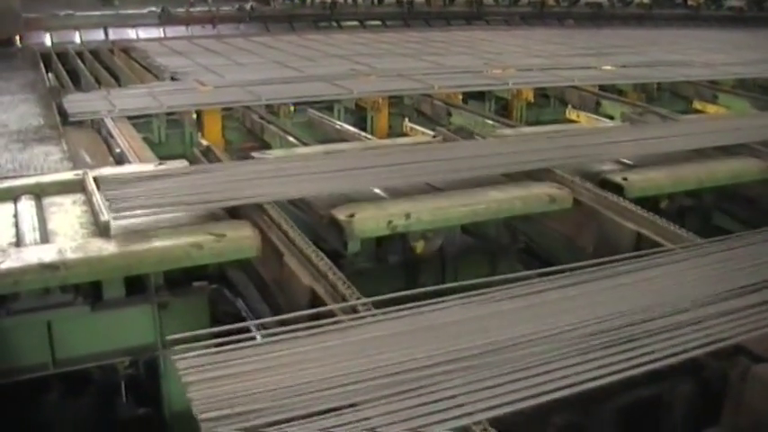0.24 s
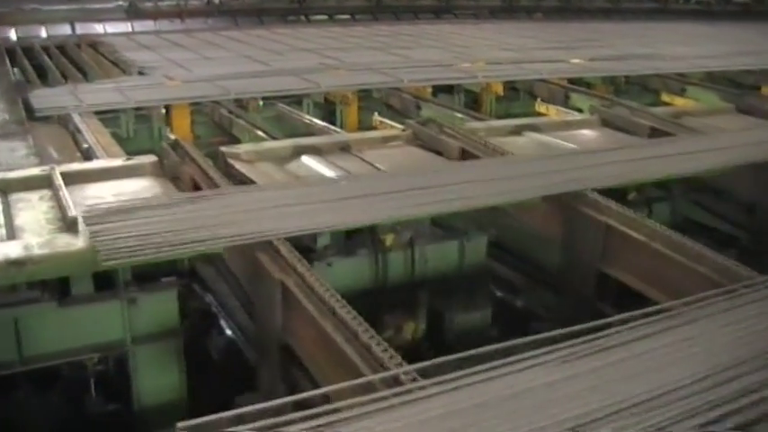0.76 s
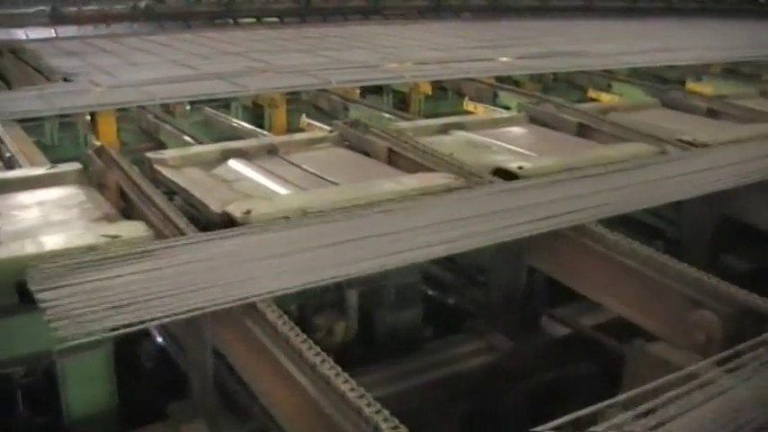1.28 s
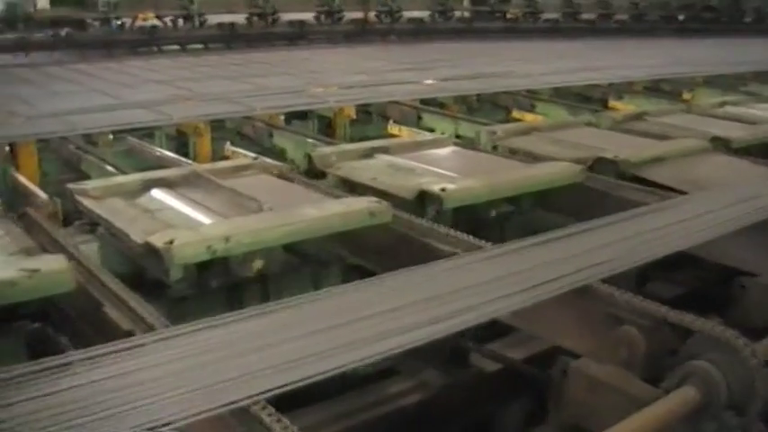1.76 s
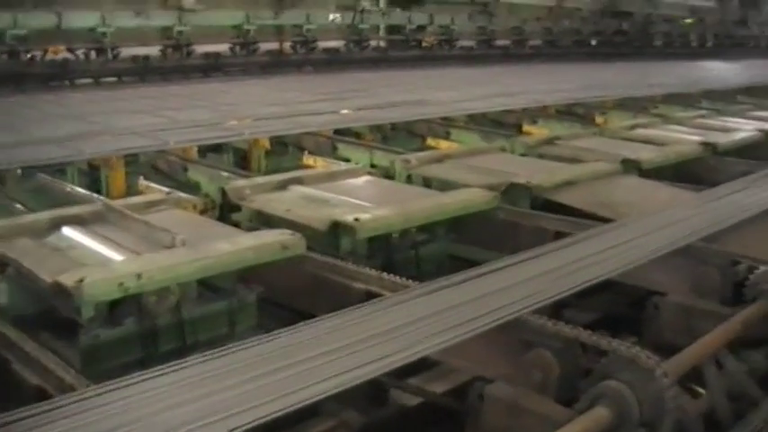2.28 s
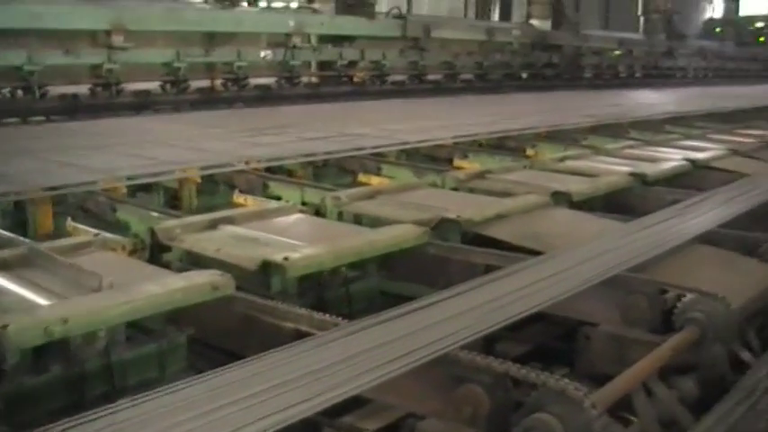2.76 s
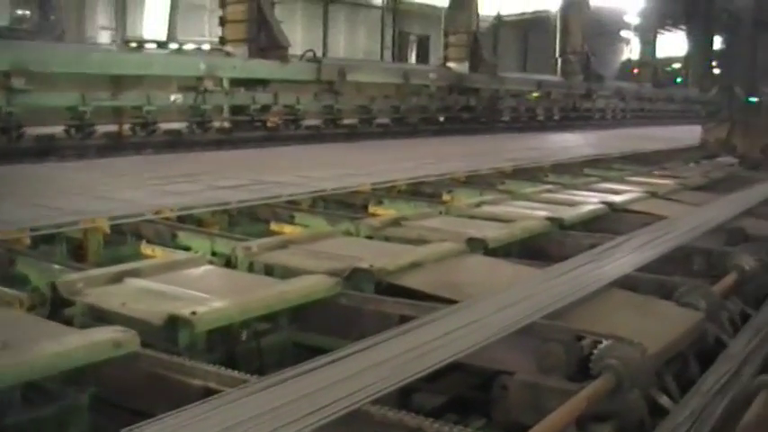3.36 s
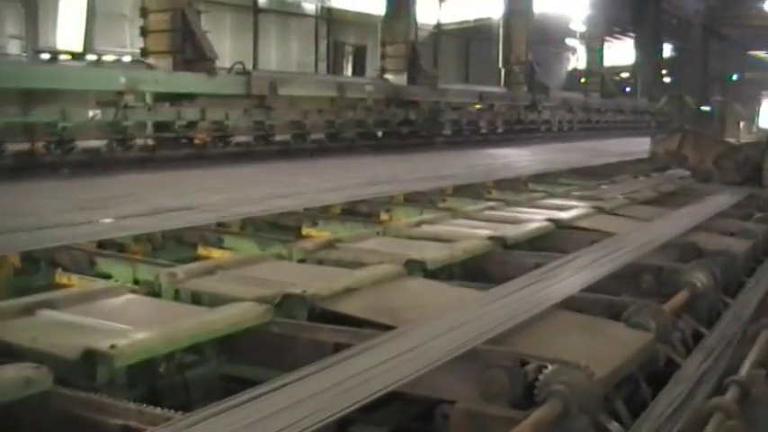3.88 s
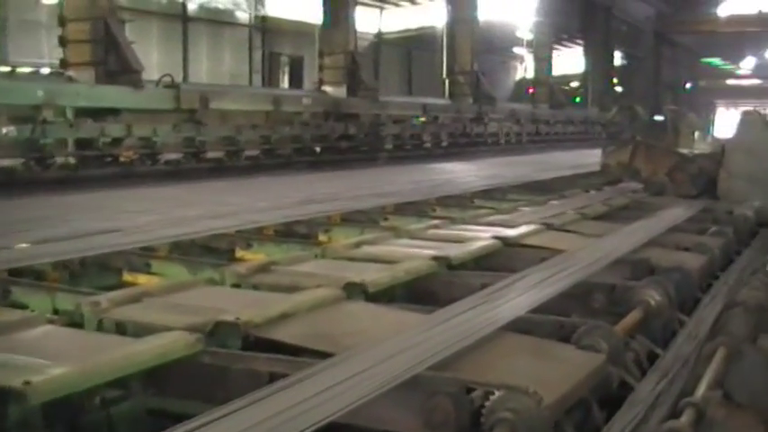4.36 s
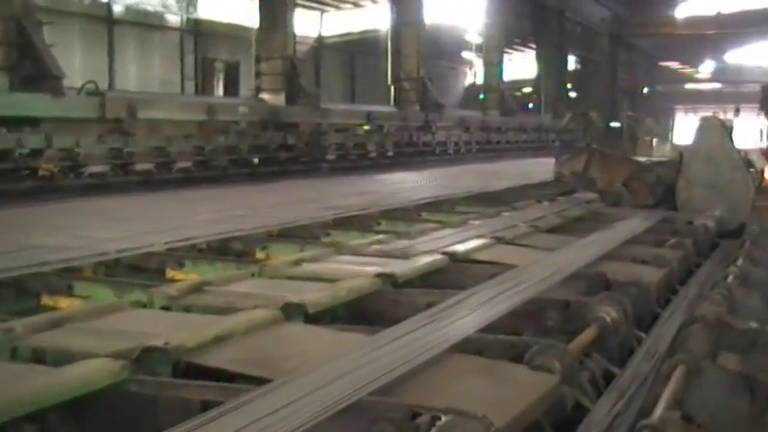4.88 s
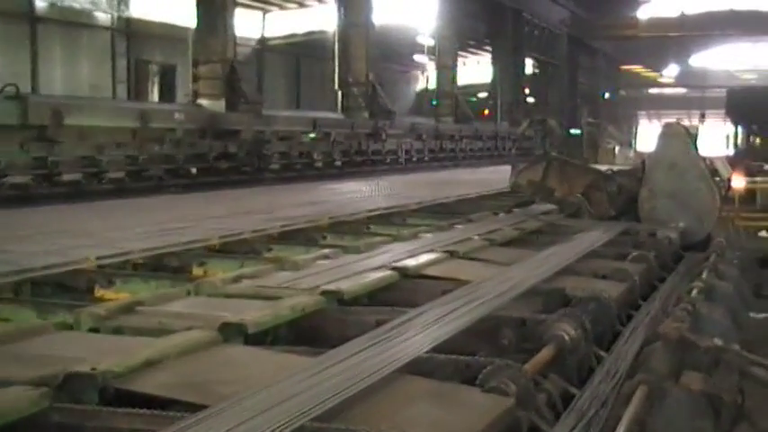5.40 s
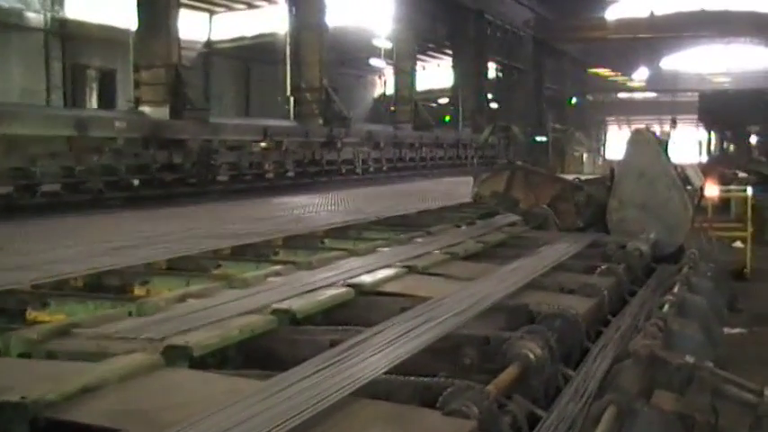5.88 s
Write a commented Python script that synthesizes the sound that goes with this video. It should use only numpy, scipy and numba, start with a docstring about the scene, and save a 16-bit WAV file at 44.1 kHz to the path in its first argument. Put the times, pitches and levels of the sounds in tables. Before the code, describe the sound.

In a large reverberant steel mill, chain conveyors rumble and long bars rattle under an air hiss. Around one second a jet bursts straight at the microphone, bright and roaring, pushing down the machinery. A bundle crashes down just before two seconds as the blast closes; then the hiss settles and scattered clanks, rattles and dull thuds continue.

```python
"""Compressed air hisses in a steel mill hall as filtered turbulence noise; for a second the jet blasts straight
at the listener, bright, with a wide roar of microphone overload, and a gain control pushes the machinery down.
Long bars clank and rattle across a cooling bed: showers of tiny contacts excite decaying steel modes and hall noise.
Chain conveyors rumble as noise shaped by frame resonances. A bundle crashes down near the end of the blast,
then the hiss settles and smaller clanks go on, with dull frame thuds and a few thin squeaks."""
import sys
import numpy as np
from scipy import signal
from scipy.fft import rfft, irfft, next_fast_len
from scipy.io import wavfile
from scipy.ndimage import uniform_filter1d
from numba import njit

SR = 44100
rng = np.random.default_rng(int(sys.argv[2]) if len(sys.argv) > 2 else 0)


def int16_out(signal):
    """Quantize to a 16-bit WAV file."""
    q = np.round(np.clip(np.atleast_2d(signal).T, -1, 1) * 32767)
    wavfile.write(sys.argv[1], SR, q.astype(np.int16))


N = 270333

IDLE_RATTLE_DB = -29  # bars trembling between shoves, before the trim in rattle()


def air_jet(flow, aim, gain_db=-0.23, flutter_db=0.73):
    """Jet directivity: turbulence radiates noise whose highest treble is beamed along the axis."""
    # hiss heard from the side of the jet: hz, density_db (per Hz)
    air_colour = [(300, -41), (1500, -13.5), (3000, -14), (4300, -9), (5200, -4), (6000, -0.5), (7000, 0.5),
                  (7900, -0.5), (9000, -8), (10000, -12), (12000, -21), (14000, -31.5), (16000, -46)]
    # directivity gain on the axis of the jet: hz, gain_db
    air_beam = [(2000, 1), (4000, 5), (5000, -6), (6000, -2.5), (7000, 2), (8000, 3.5), (10000, 11.5),
                (12000, 17), (15500, 29)]
    # spits as the jet opens: start_s, level_db, t60_s
    spit_events = [(0.95, -10, 0.03), (.982, -19, 0.06)]
    t = np.arange(N) / SR
    turbulence = unit(colour(rng.standard_normal((2, N)), air_colour))
    hz, frame_s, spectrum = signal.stft(turbulence, SR, nperseg=512)
    beam_db = np.outer(across(air_beam, hz), np.interp(frame_s, t, aim))
    hiss = signal.istft(spectrum * undb(beam_db), SR)[1][:, :N]
    flutter = undb(gain_db + flutter_db * walk(14))
    spits = sum(undb(db) * fade(t - start, t60) for start, db, t60 in spit_events)
    return stereo(plates(hiss * (flow * flutter + spits)))


def blast(flow, aim, common=0.29, on_axis_db=4.5, sideways_db=-46):
    """Microphone overload: a wide, hollow roar, mostly in antiphase at the two ears, as the jet hits."""
    # roar of the overloaded microphone: hz, density_db (per Hz)
    blast_colour = [(25, -10), (100, -9), (300, 1), (1000, 9.5), (2500, 3.5), (4500, 1.5), (8000, -11),
                    (16000, -30)]
    mid, side = unit(colour(rng.standard_normal((2, N)), blast_colour))
    roar_db = sideways_db + (on_axis_db - sideways_db) * aim + 0.46 * walk(30.5)
    return np.array([common * mid + side, common * mid - side]) * flow * undb(roar_db)


def air_flow():
    """Incoherent sources add in power: leak and blows sum, and the strongest dominates the mean aim."""
    # blows of compressed air: opens_s, rise_s, starts_to_shut_s, fall_s, level_db (before supply pressure),
    # aim (1 at the listener, 0 sideways, below 0 away)
    blows = [(.02, 0.85, 1.923, 0.42, -14.5, 0.23), (.935, .07, 1.596, 0.43, -7, 0.86),
             (1.95, 1, 6.2, .1, -20.5, -.22)]
    leak_db, leak_aim = -34.5, -0.25  # the hiss that never stops, before supply pressure
    valve_curve = 1.41  # the flow grows with this power of the valve's opening
    pressure_db_per_s = 1.1  # the air supply slowly builds up
    powers = [undb(leak_db) ** 2 * np.ones(N)]
    aims = [leak_aim]
    for opens, rise, shuts, fall, db, aim in blows:
        opening = ramp(opens, rise) * (1 - ramp(shuts, fall))
        powers.append((undb(db) * opening ** valve_curve) ** 2)
        aims.append(aim)
    power = np.sum(powers, axis=0)
    pressure = undb(pressure_db_per_s * (np.arange(N) - N / 2) / SR)
    mean_aim = np.dot(aims, powers) / power
    return np.sqrt(power) * pressure, mean_aim


def plates(x, count=5, echo_db=-20, drift_s=.00015):
    """Early reflection: nearby steel plates return faint echoes whose path lengths wander."""
    out = x
    for lag_s in rng.uniform(.001, .007, count):
        earlier = np.arange(N) - SR * (lag_s + drift_s * walk(1))
        out = out + undb(echo_db) * x[:, np.clip(earlier.astype(int), 0, N - 1)]
    return out


def clanks(rise_s=0.0018, spot_width=0.14, gain_db=5.0, strike_db=-3, strike_t60=0.0064):
    """Impact excitation: a dying shower of contacts rings the struck spot, duller where the corner is low."""
    # bars landing on the bed: start_s, level_db (before gain_db), t60_s (of the bouncing),
    # corner_hz (brightness), spot_hz (resonance of the struck spot), spot_db (its height)
    landings = [(.350, -24, .13, 1500, 950, 14), (.367, -19, 0.08, 1810, 1190, 8),
                (0.38, -21, 0.73, 4950, 1400, 2), (0.536, -27, .25, 7000, 1350, 10),
                (.773, -25, 0.17, 2520, 730, -13), (1.862, -15.5, 0.32, 2000, 990, 8),
                (1.887, -10, 0.13, 2030, 1095, 14), (1.959, -7.5, 0.31, 7600, 960, 15),
                (1.959, -16.5, 0.26, 900, 620, 19), (1.985, -11, .26, 3170, 1680, 9),
                (2.575, -23, 0.089, 3560, 1610, 5), (2.787, -24, 0.24, 4000, 1500, 0),
                (2.974, -22.5, 0.17, 905, 668, 10), (3.189, -28.5, .24, 2200, 1300, 4),
                (3.361, -17, 0.061, 3400, 2900, 4), (3.385, -15.5, 0.13, 4000, 2650, 3),
                (3.406, -23.5, 0.42, 1980, 1320, -1), (3.747, -15.5, 0.056, 2300, 1840, 13),
                (3.756, -16.5, 0.072, 1500, 315, 17), (4.09, -22, .064, 1090, 745, 9),
                (4.118, -26, 0.21, 1100, 840, 8), (4.192, -25, 0.16, 1100, 860, 11),
                (4.349, -22.5, 0.31, 5500, 1300, 5), (4.371, -27.5, 0.39, 5500, 2500, 5),
                (4.45, -24, 0.22, 990, 643, 3), (5.278, -21, 0.074, 1406, 700, 11),
                (5.330, -27, .15, 3200, 2000, 2), (5.671, -25, 0.1, 2735, 2020, 12),
                (5.941, -23, .3, 3198, 840, 14)]
    # spectrum of the contacts: hz, density_db (per Hz)
    clank_colour = [(30, -51), (100, -36), (250, -7.5), (470, -4), (650, 3.5), (1000, 0), (1600, 2.5),
                    (2700, 0), (4000, -2), (7500, 2.5), (10000, -9), (16000, -36)]
    age = np.arange(SR // 2) / SR
    shower = contacts(per_s=6000, scatter_db=0)
    # the first bars hit hardest, the rest only bounce
    attack = (1 - np.exp(-age / rise_s)) * (1 + undb(strike_db) * fade(age, strike_t60))
    force = np.zeros((2, N + len(age)))
    for start, db, t60, corner_hz, spot_hz, spot_db in landings:
        softness = signal.butter(3, min(corner_hz, SR / 3), fs=SR, output="sos")
        span = int(start * SR) + np.arange(len(age))
        spot = (spot_hz, spot_width * spot_hz, spot_db)
        bounces = colour(shower[:, span % N], clank_colour, [spot])
        dulled = unit(signal.sosfilt(softness, bounces))
        force[:, span] += undb(db) * dulled * attack * fade(age, t60)
    return stereo(steel(force, ring_db=-8, hall_db=-4.5, hall_t60=0.76)) * undb(gain_db)


def rattle(load_db, turned, gain_db=-0.5, jostle_db=0.5):
    """Random impact noise: bars jostle in small flurries, louder as the chains drag them along."""
    # spectrum of the rattle: hz, density_db (per Hz)
    rattle_colour = [(60, -36), (250, -8.5), (480, -6), (680, 1), (950, -3), (1400, -4), (2000, -6),
                     (2800, -8), (4500, -11), (8000, -30), (16000, -60)]
    turn_db = -1.5  # lost when the listener has turned away
    force = contacts(per_s=2500, scatter_db=3.5) * undb(jostle_db * walk(28.1))
    bars = unit(colour(steel(force, ring_db=-12, hall_db=-1.0, hall_t60=0.94), rattle_colour))
    return stereo(bars * undb(IDLE_RATTLE_DB + load_db + turn_db * turned + gain_db))


def load():
    """Power summation: the dB by which the chains' shoves raise the rattle above idling."""
    # a bundle is shoved along: top_s, swell_s, ease_s, level_db (of the rattle, before its trim)
    shoves = [(.45, 0.27, 0.48, -25.5), (.9, 0.46, 0.16, -21.5), (2.1, 0.4, 0.17, -20),
              (3.3, 0.81, 0.8, -24.5), (4.36, 0.6, .7, -22.5), (5.5, 0.51, 0.61, -22.5),
              (6.07, 0.24, .3, -25.5)]
    power = 0
    for top, swell, ease, db in shoves:
        push = ramp(top - swell, swell) * (1 - ramp(top, ease))
        power = power + (undb(db - IDLE_RATTLE_DB) * push) ** 2
    return 10 * np.log10(1 + power)


def contacts(per_s, scatter_db):
    """Random impulse process: two streams of tiny steel-on-steel contacts of random sign and size."""
    size = rng.choice([-1, 1], (2, N)) * undb(scatter_db * rng.standard_normal((2, N)))
    return unit(size * (rng.random((2, N)) < per_s / SR))


def steel(force, ring_db, hall_db, hall_t60):
    """Convolution with an impulse response: each contact cracks, rings the modes and dies in the hall."""
    # ring of the bars and their rails: hz, level_db (relative), t60_s
    steel_modes = [(611, 0, 0.19), (695, -12, .13), (817, -6.5, 0.16), (960, -9.5, 0.29), (1183, 2, 0.14),
                   (1317, 9, .15), (1500, -25, 0.099), (1986, 0.5, 0.14), (2690, 5.5, 0.16),
                   (4640, -22, 0.27), (5070, 14, 0.23), (5670, -13, 0.2), (6040, 5, 0.16), (6600, 5, .3),
                   (7670, 21, 0.41), (7670, -1, .18)]
    t = np.arange(SR) / SR
    ring = 0
    for hz, db, t60 in steel_modes:
        mode = np.sin(2 * np.pi * (hz * t + rng.random((2, 1))))
        ring = ring + undb(db) * fade(t, t60) * mode
    # the reverberation builds up before it decays
    hall = rng.standard_normal((2, SR)) * fade(t, hall_t60) * (1 - fade(t, 0.083))
    response = (t == 0) + (undb(ring_db) * unit(ring) + undb(hall_db) * unit(hall)) / np.sqrt(SR)
    response = response / np.sqrt(np.sum(response ** 2) / 2)
    return signal.fftconvolve(force, response, axes=1)[:, :N]


def drives(load_db, turned, throb_db=0.5):
    """Structural resonance: chains and rollers rumble unevenly through the bed frame, louder under load."""
    # spectrum of the rumble: hz, density_db (per Hz)
    rumble_colour = [(25, -49), (50, -55), (85, -24), (120, -15), (170, -9), (240, -3.5), (300, 0),
                     (380, -1), (480, -3.5), (650, -7), (1000, -9), (2500, -14), (8000, -55)]
    # resonances of the drives and the bed frame: hz, width_hz, height_db
    frame = [(299, 42, 2.5), (507, 16, 3.5), (613, 29, 9), (1080, 12, 10.5)]
    idle_db, load_share = -27.5, .25  # idle level; dB of rumble gained per dB of rattle
    turn_db = -3.5  # lost when the listener has turned away
    rumble = unit(colour(rng.standard_normal((2, N)), rumble_colour, frame))
    return stereo(rumble * undb(idle_db + load_share * load_db + turn_db * turned + throb_db * walk(6.7)))


def thuds():
    """Transient vibration: the bed frame shudders with dull, low thuds, most of them under heavy landings."""
    # shaking of the bed: start_s, level_db, t60_s
    shudders = [(.36, -50, .2), (1.675, -43, .12), (1.885, -42, .12), (1.957, -39, .14), (3.355, -50, .12)]
    # spectrum of the shaking: hz, density_db (per Hz)
    thud_colour = [(15, -6), (35, -2), (60, 0), (110, -12), (300, -40)]
    t = np.arange(N) / SR
    shake = sum(undb(db) * fade(t - start, t60) for start, db, t60 in shudders)
    return stereo(shake * unit(colour(rng.standard_normal((2, N)), thud_colour)))


def squeaks(waver=0.0053):
    """Frequency modulation: sliding steel squeaks briefly on a gliding, unsteady pitch."""
    # thin squeaks: start_s, length_s, from_hz, to_hz, level_db
    slides = [(0.226, 0.021, 10500, 11000, -34), (.48, 0.051, 15400, 14600, -41),
              (1.61, 0.25, 1644, 1684, -29.5)]
    t, out = np.arange(N) / SR, 0
    drift = 1 + waver * walk(400)
    for start, length, from_hz, to_hz, db in slides:
        part = np.clip((t - start) / length, 0, 1)
        hz = (from_hz + (to_hz - from_hz) * part) * drift
        tone = np.sqrt(2) * np.sin(2 * np.pi * np.cumsum(hz) / SR)
        out = out + undb(db) * np.sin(np.pi * part) * tone
    return out


def stereo(pair):
    """Mid-side synthesis: two unrelated signals become left and right, with a width set per band."""
    # width between the two ports: hz, side_minus_mid_db
    width = [(50, -6), (130, -4), (300, -12.5), (1500, -19), (4000, -15), (7000, -13), (8000, -11),
             (9000, 2), (10000, -1.5), (12000, -8), (15000, -9)]
    side = colour(pair[1], width)
    return np.array([pair[0] + side, pair[0] - side])


def undb(db):
    """Level to amplitude: 20 dB is a factor of ten."""
    return 10 ** (np.asarray(db) / 20)


def unit(x):
    """Normalization of the mean power: scale to rms 1."""
    return x / np.sqrt(np.mean(x ** 2))


def across(points, hz, axis=1):
    """Linear interpolation of one table column on a log-frequency axis."""
    points = np.array(points)
    return np.interp(np.log(hz + 1), np.log(points[:, 0]), points[:, axis])


def colour(x, points, peaks=()):
    """Spectral shaping: filter by a curve in dB, with resonance peaks on top."""
    size = next_fast_len(x.shape[-1] + SR // 10)
    hz = np.arange(size // 2 + 1) * SR / size
    db = across(points, hz)
    for peak_hz, width_hz, gain_db in peaks:
        db = db + gain_db / (1 + (2 * (hz - peak_hz) / width_hz) ** 2)
    return irfft(rfft(x, size) * undb(db), size)[..., :x.shape[-1]]


def walk(rate):
    """Low-frequency noise: random levels held 1 / rate s and smoothed twice, scaled to rms 1."""
    k = int(SR / rate)
    steps = np.repeat(rng.standard_normal(N // k + 1), k)
    return unit(uniform_filter1d(uniform_filter1d(steps, k), k)[:N])


def fade(t, t60):
    """Exponential decay from t = 0, by 60 dB in t60 seconds."""
    return (t >= 0) * undb(-60 * np.maximum(t, 0) / t60)


def ramp(start, length):
    """Linear envelope: a straight rise from 0 to 1, both times in seconds."""
    return np.clip((np.arange(N) / SR - start) / length, 0, 1)


def scene():
    """Superposition of air, bars and conveyors."""
    flow, aim = air_flow()
    load_db = load()
    turned = ramp(.25, 2.15)  # the listener turns away from the nearest conveyor
    air = air_jet(flow, aim) + blast(flow, aim)
    bars = clanks() + rattle(load_db, turned)
    return air + bars + drives(load_db, turned) + thuds() + squeaks()


@njit
def follow(x, attack, release):
    """One-pole smoothing with two rates: attack upwards, release downwards."""
    out, held = np.empty(len(x)), x[0]
    for i in range(len(x)):
        held += (x[i] - held) * (attack if x[i] > held else release)
        out[i] = held
    return out


def gain_control(x, window_s=0.01):
    """Dynamic compression: level above the threshold turns everything down; the gain creeps back."""
    # weighting of the level detector, most sensitive to treble: hz, gain_db
    detector_weighting = [(1500, -4.5), (6000, -1)]
    threshold_db, ratio = -20, 3.57  # threshold of the weighted level
    attack_s, release_s = 0.0078, 0.31
    power = uniform_filter1d(np.mean(colour(x, detector_weighting) ** 2, axis=0), int(window_s * SR))
    over_db = np.maximum(10 * np.log10(np.abs(power) + 1e-12) - threshold_db, 0)
    held_db = follow(over_db, 1 / (attack_s * SR), 1 / (release_s * SR))
    return x * undb(-held_db * (1 - 1 / ratio))


def record(dry):
    """Interchannel phase and level: two close ports differ a little, then gain control and a steep low-pass."""
    # the two microphone ports: hz, left_lead_rad, left_minus_right_db
    port_table = [(40, 0.22, -1), (150, -0.21, 2.5), (280, -0.29, -0.5), (700, -0.059, -0.5),
                  (1500, -0.15, 0.1), (4000, 0.19, 0), (6500, 0.051, 0.9), (8100, -0.7, 1.5),
                  (9800, -0.85, -1), (10300, -1.6, -4), (13000, -0.16, 1), (16000, 0, -8)]
    top_hz = 15800
    size = next_fast_len(N + SR // 10)
    hz = np.arange(size // 2 + 1) * SR / size
    half = np.array([[.5], [-.5]])  # each port takes half of the difference
    phase = np.exp(1j * half * across(port_table, hz, axis=1))
    level = undb(half * across(port_table, hz, axis=2))
    at_ports = irfft(rfft(dry, size) * (phase * level), size)[:, :N]
    low_pass = signal.ellip(10, .2, 80, top_hz, fs=SR, output="sos")
    return signal.sosfilt(low_pass, gain_control(at_ports))


dry = scene()
out = record(dry)
int16_out(out)
```